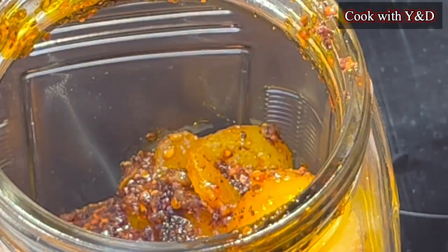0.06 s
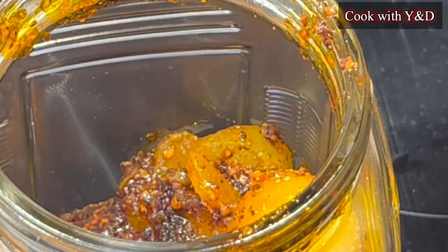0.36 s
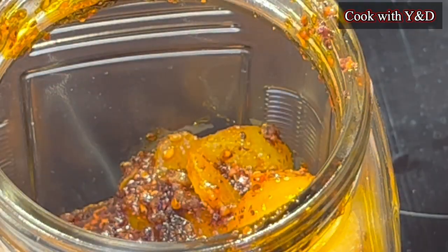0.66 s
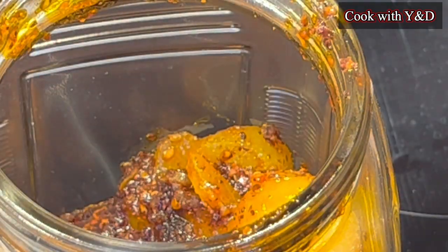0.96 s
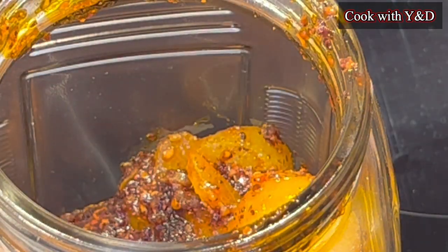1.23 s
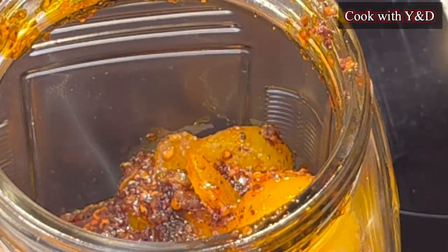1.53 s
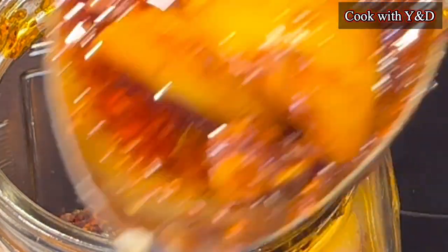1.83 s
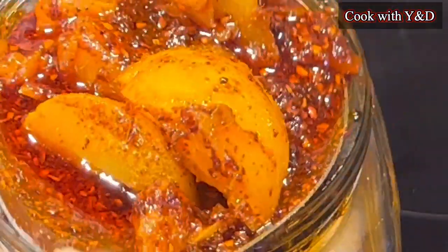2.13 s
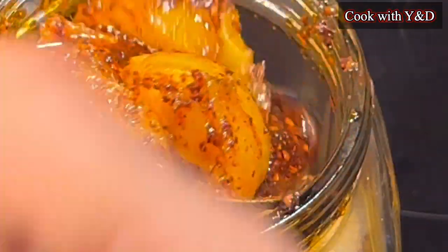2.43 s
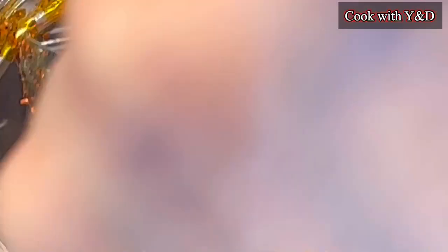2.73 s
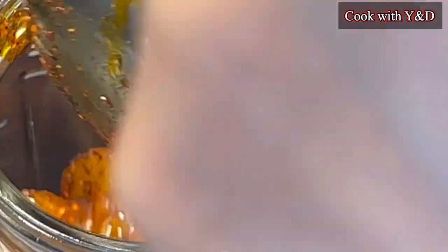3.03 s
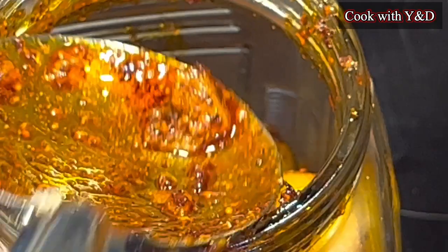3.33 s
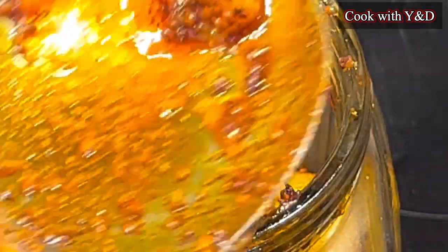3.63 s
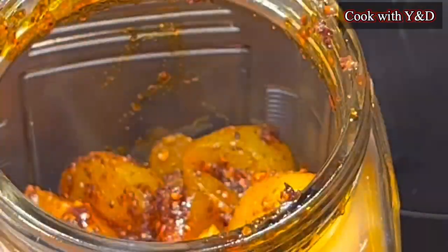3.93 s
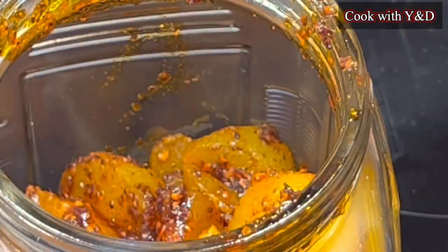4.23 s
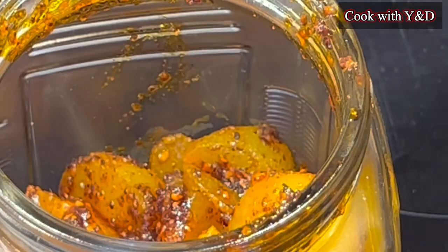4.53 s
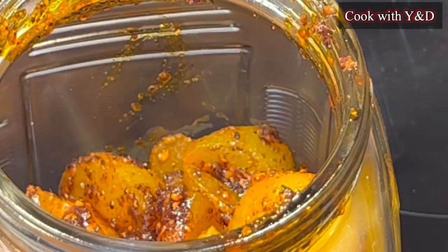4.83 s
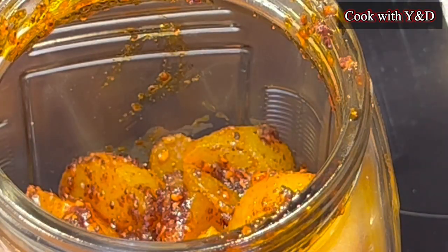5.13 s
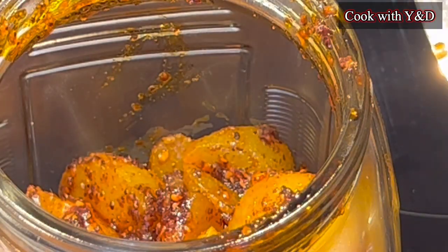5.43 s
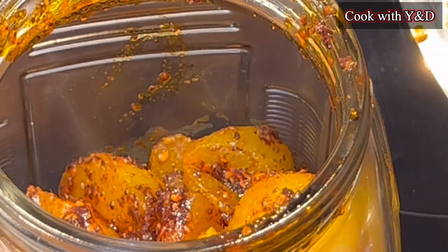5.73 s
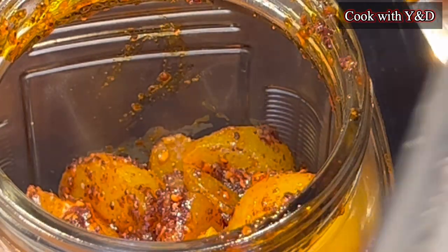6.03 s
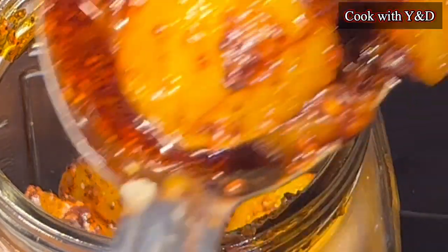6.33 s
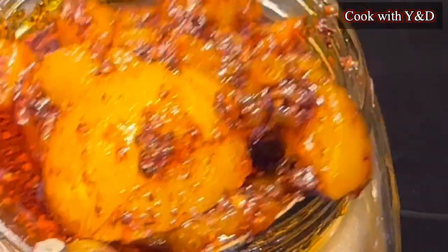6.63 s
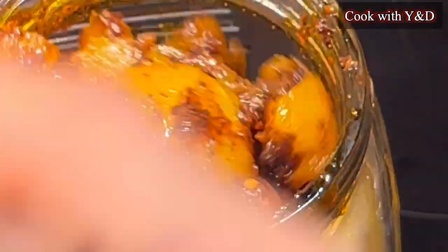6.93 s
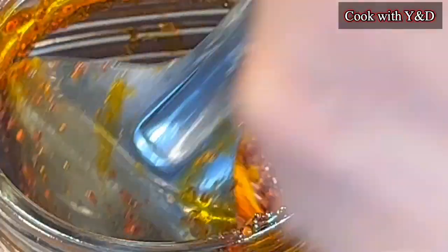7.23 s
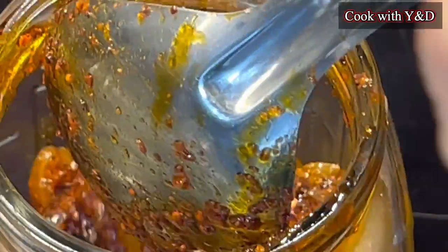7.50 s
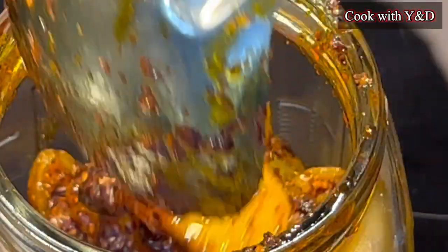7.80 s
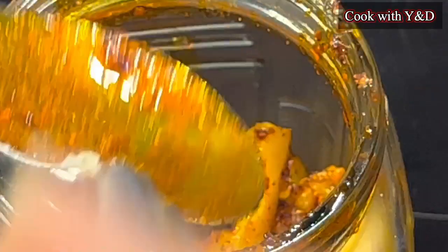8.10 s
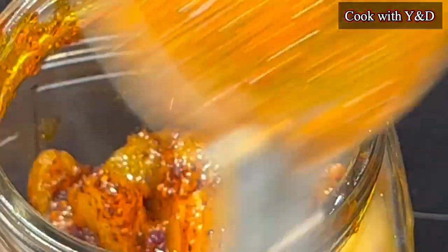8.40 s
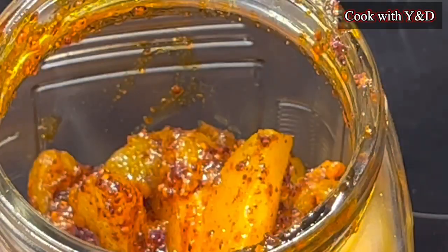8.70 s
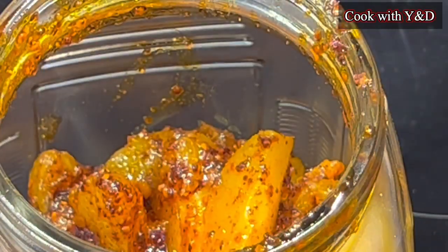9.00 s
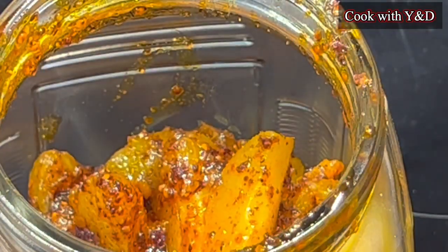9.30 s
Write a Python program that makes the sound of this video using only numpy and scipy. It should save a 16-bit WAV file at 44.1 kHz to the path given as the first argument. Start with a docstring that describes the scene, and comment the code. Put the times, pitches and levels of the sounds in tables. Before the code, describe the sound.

Heard close up in a small, slightly reverberant kitchen, a ladle scoops wet pickle from a metal bowl three times, scraping and knocking so the bowl rings briefly. Between the scoops come two quieter rounds at a glass jar: light clinks on the rim, squelching slides, soft thuds and a faint rumble as the jar rocks. Tiny oil bubbles pop over a low hum.

```python
"""A steel ladle scoops oily pickle from a metal bowl, tips it into a glass jar, twice, and scoops again.
Impacts excite the damped normal modes of bowl and jar; stick-slip friction makes them scrape and squeak.
Wet pieces slide and plop, air pockets resonate, oil bubbles burst and the jar rocks on the counter.
All is heard close up, with the rustle of an arm, in a small reverberant kitchen with a low hum."""
import sys
import numpy as np
from scipy import signal
from scipy.fft import rfft, irfft
from scipy.io import wavfile
from scipy.ndimage import uniform_filter1d

SR = 44100
rng = np.random.default_rng(int(sys.argv[2]) if len(sys.argv) > 2 else 0)


def store_wav(level_fs):
    """Save 16-bit WAV to argv[1]."""
    pcm = np.round(np.clip(np.atleast_2d(level_fs), -1, 1) * 32767)
    wavfile.write(sys.argv[1], SR, pcm.T.astype(np.int16))


N = 421139


def amp(db):
    """Amplitude ratio of a level in decibels."""
    return 10 ** (np.asarray(db) / 20)

def rms(x):
    """Root-mean-square amplitude."""
    return np.sqrt(np.mean(x ** 2) + 1e-20)

def unit_rms(x):
    """Normalisation to unit power."""
    return x / rms(x)

def curve_at(points, hz):
    """Linear interpolation on a logarithmic frequency axis."""
    frequencies, values = np.transpose(points)
    return np.interp(np.log(hz + 1), np.log(frequencies + 1), values)

def add(mix, start, sound):
    """Superposition: a sound joins the mix at its start time in seconds."""
    part = mix[max(round(start * SR), 0):][:len(sound)]
    part += sound[:len(part)]

def colour(x, points):
    """Minimum-phase filtering by a curve of (Hz, dB) points."""
    log_gain = np.log(amp(curve_at(points, abs(np.fft.fftfreq(2048, 1 / SR)))))
    taps = np.fft.ifft(np.exp(np.conj(signal.hilbert(log_gain)))).real
    return signal.oaconvolve(x, taps[:len(taps) // 2])[:len(x)]

# Edges in Hz of the bass, low, middle, high and top bands.
BAND_EDGES_HZ = [100, 450, 1200, 3000, 6500, 17000]
def bands(x):
    """A band-pass filter bank splits a sound five ways."""
    return [signal.sosfilt(signal.butter(4, edges, "band", fs=SR, output="sos"), x)
            for edges in zip(BAND_EDGES_HZ, BAND_EDGES_HZ[1:])]

def smooth_noise(size, seconds):
    """Low-pass noise: a random drift of unit power."""
    window = np.hanning(int(seconds * SR) + 3)
    return unit_rms(signal.oaconvolve(rng.standard_normal(size), window, "same"))

def grains(size, per_s, spread_db):
    """A Poisson process: independent impulses of uneven strength."""
    strength = amp(spread_db * np.minimum(rng.exponential(1, size), 4))
    return strength * rng.choice([-1, 1], size) * (rng.random(size) < per_s / SR)

def steadied(x, seconds=0.092):
    """Division by the running RMS removes slow swings and leaves the grain."""
    return x / np.sqrt(abs(uniform_filter1d(x ** 2, int(seconds * SR))) + 1e-12)

def gesture(length, level_db, change_db, attack_s, release_db_per_s):
    """Amplitude envelope of a movement: linear onset, swell or fade, then exponential decay."""
    t = np.arange(0, length + 50 / release_db_per_s, 1 / SR)
    held_db = level_db + change_db * np.minimum(t / length, 1)
    return np.minimum(t / attack_s, 1) * amp(held_db - release_db_per_s * np.maximum(t - length, 0))

def struck(modes, spot_hz, boost_db, width_hz=70):
    """The point of excitation weights the modes, favouring those near one frequency."""
    return [(hz, db + boost_db * np.exp(-((hz - spot_hz) / width_hz) ** 2), t60)
            for hz, db, t60 in modes]

def impulse_response(modes, clatter, ring_db, crack_s, clatter_t60, clatter_db):
    """Modal superposition: a few long modes over a noisy crack and dense, heavily damped modes."""
    t = np.arange(int(.8 * SR)) / SR
    decay = np.exp(-t / crack_s) + amp(clatter_db - 60 * t / clatter_t60)
    dense = colour(rng.standard_normal(len(t)) * decay, clatter)
    ring = np.zeros(len(t))
    for hz, db, t60 in modes:
        envelope = amp(db + 1.4 * rng.standard_normal() - 60 * t / t60)
        ring += envelope * np.sin(2 * np.pi * (hz * t + rng.random()))
    soft_onset = 1 - np.exp(-t / 0.00043)
    return (dense + amp(ring_db) * ring) * soft_onset

def blow(response, thump_db, clang_db, tick_db, onset_s):
    """An impact's spectrum: thump, clang and tick set the onset level of bass, middle and top."""
    low_db = thump_db + 0.55 * (clang_db - thump_db)
    high_db = clang_db + 0.27 * (tick_db - clang_db) - .5
    levels_db = [thump_db, low_db, clang_db, high_db, tick_db]
    return sum(amp(db) * band / rms(band[:int(onset_s * SR)])
               for db, band in zip(levels_db, bands(response)))

def free_vibration(rings, modes, t60_factor, attack_s, damping_db_per_s):
    """Free decay: once the ladle bounces clear, modes ring until ladle or pickle damps them."""
    out, t = np.zeros(N), np.arange(N) / SR
    mode_hz = [hz for hz, _, _ in modes]
    for hz, db, t60 in modes:
        envelope = np.zeros(N)
        for start, length, level_db, favoured_hz in rings:
            nearest_hz = [min(mode_hz, key=lambda other: abs(other - f)) for f in favoured_hz]
            if hz in nearest_hz:
                decay_db = -60 * length / (t60_factor * t60)
                add(envelope, start, gesture(length, level_db + db, decay_db, attack_s, damping_db_per_s))
        if envelope.any():
            waver = 1 + .16 * smooth_noise(N, seconds=.025)  # shifting pickle chokes and frees the mode
            out += envelope * waver * np.sin(2 * np.pi * (hz * t + rng.random()))
    return out

def bubbles(size, low_hz, high_hz, per_s, cycles):
    """Bubble resonance: air squeezed from wet pickle rings in damped, rising blips at twelve pitches."""
    out, t = np.zeros(size), np.arange(SR // 30) / SR
    for hz in np.geomspace(low_hz, high_hz, 12):
        envelope = np.exp(-hz * t / cycles) * (1 - np.exp(-hz * t))
        blip = envelope * np.sin(2 * np.pi * hz * t * (1 + 3 * t))
        out += signal.oaconvolve(grains(size, per_s, spread_db=3.5), blip)[:size]
    return out


# The part of diffuse sound that differs between the ports. Each row: frequency in Hz, gain in dB.
SIDE_SPECTRUM = [(100, -10.5), (400, -3.5), (1000, 2), (2500, -13), (6000, -21.5), (15000, -21)]
def diffuse_stereo(middle, side):
    """A diffuse field is only partly coherent between two microphone ports."""
    side = colour(side, SIDE_SPECTRUM)
    return np.array([middle + side, middle - side])

# Spectrum of still room air. Each row: frequency in Hz, relative level in dB.
AIR_SPECTRUM = [(53, -33.5), (90, 2), (205, -6), (255, -1), (310, -10.5), (360, 0), (429, -8.5), (532, -12),
                (786, -22), (1140, -21.5), (1290, -33.5), (2180, -24.5), (2890, -33), (8000, -34.5),
                (16000, -43)]
def background():
    """The noise floor: broadband air, a faint whine and a hum that beats with a narrow band of noise."""
    t = np.arange(N) / SR
    hum = amp(-49.5) * np.sin(2 * np.pi * 61.5 * t)
    drone = amp(-68) * unit_rms(smooth_noise(N, seconds=.08) * np.sin(2 * np.pi * 62 * t))
    middle, side = (unit_rms(colour(rng.standard_normal(N), AIR_SPECTRUM)) for _ in range(2))
    whine = amp(-90) * np.sin(2 * np.pi * 362 * t) + amp(-85.5) * np.sin(2 * np.pi * 1168 * t)
    return hum + drone + whine + amp(-68) * diffuse_stereo(middle, side)

# Reverberation of the kitchen. Each row: frequency in Hz, time to fall 60 dB in seconds.
KITCHEN_T60 = [(100, .35), (500, .36), (2000, .36), (5000, .28), (9000, .24), (16000, .19)]
def kitchen(x):
    """Reverberation: diffuse reflections decay exponentially, each band at its own rate."""
    hz, t, spectra = signal.stft(rng.standard_normal((2, SR // 2)), SR, nperseg=256)
    decay = amp(-60 * t / curve_at(KITCHEN_T60, hz)[:, None])
    tail = signal.istft(spectra * decay, SR)[1]
    tail *= np.clip(np.arange(tail.shape[1]) / SR / 0.0025, 0, 1)  # reflections build up
    tail /= np.linalg.norm(tail[0])
    return diffuse_stereo(*signal.fftconvolve(x[None], tail, axes=1)[:, :N])

# Swings of the arm. Each row: start and length in seconds, level and its change in dB.
ARM_SWINGS = [(3.6, .5, -82, 12.5), (5.614, 0.27, -86.5, 20)]
def arm_rustle():
    """Amplitude-modulated noise: a soft rustle follows the arm's speed between bowl and jar."""
    speed = np.zeros(N)
    for start, length, level_db, change_db in ARM_SWINGS:
        add(speed, start, gesture(length, level_db, change_db, attack_s=0.094, release_db_per_s=74))
    spectrum = [(200, -8.5), (700, 7), (1200, -7), (2500, -21), (8000, -31)]
    return speed * unit_rms(colour(rng.standard_normal(N), spectrum))

# The ladle leans on the jar. Each row: start and length in seconds, level and its change in dB.
JAR_LEANS = [(2.41, 0.58, -51.5, -8), (6.714, 0.62, -51, -1.5)]
def jar_rocking():
    """Repeated impacts of the rocking jar on the counter merge into a deep, band-limited rumble."""
    lean = np.zeros(N)
    for start, length, level_db, change_db in JAR_LEANS:
        add(lean, start, gesture(length, level_db, change_db, attack_s=0.45, release_db_per_s=45))
    bass_filter = signal.butter(3, [55, 85], "band", fs=SR, output="sos")
    bumps = signal.sosfilt(bass_filter, grains(N, per_s=600, spread_db=1.2))
    return lean * steadied(bumps, seconds=0.042)

# Oil bubbles. Each row: start in seconds, relative level in dB, pitch in Hz, time constant in seconds.
OIL_BURSTS = [(0.6694, -40.5, 7040, 0.000091), (0.8358, -63.5, 1930, 0.00025),
              (1.1257, -58.5, 2690, .00019), (3.1572, -59.5, 4270, 0.00027), (4.643, -48, 3400, 0.00014),
              (4.675, -44.5, 5030, 0.00015), (4.7013, -39.5, 2250, 0.00012), (4.8417, -26.5, 1760, 0.00013),
              (4.9753, -41.5, 3280, 0.00046), (5.215, -57, 2810, 0.00021), (5.3586, -54.5, 4700, 0.00016),
              (5.8586, -51.5, 8300, 0.00018), (6.6167, -47.5, 8780, 0.00013),
              (7.5843, -55.5, 2470, 0.00081)]
def oil_pops():
    """A bursting bubble radiates a heavily damped pulse, followed by a fine spatter."""
    out, t = np.zeros(N), np.arange(SR // 30) / SR
    for start, level_db, hz, decay_s in OIL_BURSTS:
        age = t / decay_s
        snap = np.sin(2 * np.pi * hz * t) * age ** 2 * np.exp(-age)
        spray = colour(rng.standard_normal(len(t)), [(hz / 4, -24), (hz, 0), (hz * 2, -8), (hz * 4, -22)])
        spatter = amp(-27.5) * unit_rms(spray) * np.exp(-t / 0.0076)
        add(out, start, amp(level_db + 5) * (snap + spatter))
    return out

# Spectra of sliding pickle. Each row: frequency in Hz, relative level in dB.
RUMBLE_SPECTRUM = [(40, -21), (65, -17), (90, -5), (140, 2.5), (200, -9), (300, -16), (500, -24.5),
                   (1000, -58)]
SQUELCH_SPECTRUM = [(150, -16), (400, 7), (600, -7), (900, 5.5), (1500, -11), (2500, 0), (5000, -37),
                    (12000, -49)]
# Pickle settles in the jar. Each row: start and length in seconds, then relative level,
# its change and the gain of the squelch, all in dB.
PICKLE_SLIDES = [(2.383, 0.12, -59, 9.5, -22.5), (2.5, 0.071, -49, -5, -19.5),
                 (2.653, 0.036, -57, 1, -18.5), (2.828, 0.03, -57.5, -0.5, -1),
                 (2.986, 0.072, -58, -4, -15), (3.265, 0.096, -45.5, -7.5, -21),
                 (6.673, 0.024, -51.5, 2, -32), (6.753, 0.19, -54.5, 7, -18), (6.888, 0.047, -46.5, 2, -19),
                 (6.975, 0.064, -55, -7, -26), (7.23, 0.063, -43.5, -9, -16),
                 (7.298, 0.065, -63.5, 7, -1.5), (7.455, 0.076, -50.5, -11.5, -9),
                 (7.555, 0.22, -66.5, 8.5, -11.5), (7.777, 0.034, -50, -7.5, -15),
                 (8.01, 0.018, -50.5, -0.5, -27), (8.06, 0.12, -65.5, -3, -11.5)]
def pickle_slides():
    """Shot noise: many small contacts of soft, wet pieces add up to a rumble and a squelch."""
    out = np.zeros(N)
    for start, length, level_db, change_db, wet_db in PICKLE_SLIDES:
        flow = gesture(length, level_db, change_db, attack_s=0.0049, release_db_per_s=209)
        rumble = colour(grains(len(flow), per_s=350, spread_db=4.5), RUMBLE_SPECTRUM)
        squish = colour(grains(len(flow), per_s=1400, spread_db=-0.5), SQUELCH_SPECTRUM)
        blips = bubbles(len(flow), low_hz=501, high_hz=678, per_s=25, cycles=13)
        squelch = unit_rms(squish) + amp(-4) * unit_rms(blips)
        add(out, start, flow * (steadied(rumble) + amp(wet_db) * steadied(squelch)))
    return out

# Pieces land in the jar. Each row: start in seconds, relative levels of thud and splat in dB.
LANDINGS = [(2.503, -55.5, -56.5), (2.554, -56.5, -66.5), (3.243, -34.5, -43), (3.262, -35, -45.5),
            (6.891, -52.5, -46.5), (6.933, -36, -44), (7.425, -32, -36.5), (7.443, -42, -50.5)]
def pickle_plops():
    """Inelastic impact: a soft piece lands with a dull thud and a shorter wet splat."""
    out, t = np.zeros(N), np.arange(SR // 4) / SR
    thud_spectrum = [(50, -27), (90, -2.5), (150, 9.5), (300, -4), (500, -3.5), (1200, -65)]
    splat_spectrum = [(200, 1), (550, 3.5), (900, -2.5), (1400, 2), (2500, -10.5), (5000, -25.5),
                      (7000, -54), (12000, -60)]
    for start, thud_db, splat_db in LANDINGS:
        for db, decay_s, spectrum in [(thud_db, 0.015, thud_spectrum), (splat_db, 0.0062, splat_spectrum)]:
            burst = colour(rng.standard_normal(len(t)) * np.exp(-t / decay_s), spectrum)
            add(out, start, amp(db) * burst / rms(burst[:int(.025 * SR)]))
    return out

# Normal modes of the jar. Each row: frequency in Hz, relative level in dB, T60 in seconds.
JAR_MODES = [(590, 0, .13), (660, -3, .1), (830, -12, .15), (1490, -12, .15), (2234, -12, .2),
             (2520, -8, .12), (2635, 3, .16), (2862, 0, .19), (3300, -10, .1), (3607, -1, .11),
             (3806, 3, .09), (3930, 2, .1), (4700, -10, .1), (5200, -9, .12), (5545, -8, .12),
             (5803, -9, .12), (6700, -9, .12), (7429, -7, .12), (7671, -5, .14), (8107, -6, .12),
             (11900, -13, .1)]
# Its dense, oil-damped modes. Each row: frequency in Hz, relative level in dB.
JAR_DENSE_SPECTRUM = [(100, 21), (250, 5.5), (600, 9), (900, 0), (2000, 0), (2700, 8), (3200, 1), (3850, 8),
                      (4450, -3), (5600, -2.5), (6700, -6.5), (7600, -2.5), (8600, -5.5), (12000, -5.5),
                      (15500, -13)]
def jar_response(spot_hz, ring_db, **decay):
    """Loading by ladle and pickle shifts the modes of the glass a little at each contact."""
    loaded = [(hz * (1 + .005 * rng.standard_normal()), db, t60)
              for hz, db, t60 in struck(JAR_MODES, spot_hz, boost_db=9)]
    return impulse_response(loaded, JAR_DENSE_SPECTRUM, ring_db, **decay)

# The jar rings on. Each row: start and undamped time in seconds, relative level in dB, modes in Hz.
JAR_FREE_RINGS = [(2.523, .025, -61.5, [590, 5545, 5803]), (2.833, 0.048, -69, [2635, 3607, 5545]),
                  (2.834, .045, -52.5, [660]), (3.239, 0.0076, -37, [3806]),
                  (3.241, .05, -45.5, [2862, 3607]), (6.677, 0.019, -62.5, [3806]),
                  (6.818, 0.029, -62, [2635, 3806]), (6.912, 0.033, -49.5, [660, 3806, 6700]),
                  (7.222, 0.0022, -37.5, [2635]), (7.223, .08, -49.5, [590, 2862]),
                  (7.352, 0.031, -60.5, [660, 2635, 3607]), (7.759, 0.065, -44, [2862]),
                  (7.76, .03, -59, [3607, 7671])]
def jar_ringing():
    """Free vibration of the glass after a contact."""
    return free_vibration(JAR_FREE_RINGS, JAR_MODES, t60_factor=1.5, attack_s=.00069, damping_db_per_s=659)

# The ladle rubs the rim. Each row: start and length in seconds, relative level and its change in dB,
# favoured mode in Hz.
RIM_RUBS = [(2.818, 0.045, -67.5, -3.5, 3607), (3.258, 0.056, -46.5, -14, 7671),
            (6.686, 0.14, -69.5, -3, 4700), (6.795, 0.041, -62.5, 9.5, 2635), (6.913, 0.011, -43, -5, 3806),
            (7.177, 0.011, -65, -2, 2635), (7.243, 0.075, -61.5, 3.5, 2635), (7.339, 0.008, -56, 1, 3607),
            (7.366, 0.019, -58, -9, 5545), (7.573, 0.014, -68.5, -5.5, 3930),
            (7.662, 0.049, -68.5, -4, 2862), (7.749, 0.014, -48, -1, 5803)]
def jar_rubs():
    """Forced vibration: random frictional slips drive the modes of the glass."""
    out = np.zeros(N)
    spectrum = [(600, -7), (1800, 2), (2700, -7.5), (4500, -5.5), (6500, -4), (8000, -10), (15000, -24)]
    for start, length, level_db, change_db, spot_hz in RIM_RUBS:
        pressure = gesture(length, level_db, change_db, attack_s=0.0023, release_db_per_s=298)
        response = jar_response(spot_hz, ring_db=-21, crack_s=.001, clatter_t60=.05, clatter_db=-16)
        slips = grains(len(pressure) + len(response) - 1, per_s=1200, spread_db=4.5)
        rub = colour(signal.fftconvolve(slips, response, "valid"), spectrum)
        add(out, start, pressure * steadied(rub))
    return out

# The ladle hits the rim. Each row: start in seconds, relative levels of thump, clang, tick and ring
# in dB, favoured mode in Hz.
RIM_STRIKES = [(2.523, -63.5, -69.5, -42, -39, 5803), (2.834, -52.5, -65, -70, -10, 590),
               (2.863, -51, -59, -69, -16, 590), (3.238, -54, -31, -28, -24.5, 7671),
               (6.675, -43, -63, -68.5, -13, 3806), (6.826, -71, -56, -73, -22, 3930),
               (6.911, -49, -46.5, -57, -18, 3930), (6.943, -49.5, -51, -62, -34, 3806),
               (7.222, -38.5, -45, -37.5, -26, 7429), (7.262, -46, -51, -67, -12, 590),
               (7.336, -53.5, -56, -60, -13, 3607), (7.353, -40.5, -48.5, -57.5, -16.5, 3930),
               (7.372, -40, -60, -69, -8, 590), (7.704, -66, -54, -68.5, -21, 2862),
               (7.759, -53, -41.5, -39.5, -24.5, 5803), (8.01, -70, -59, -70, -11, 3806)]
def jar_clinks():
    """Impulsive excitation of the glass: each spot struck brings out its own pitch."""
    out = np.zeros(N)
    for start, thump_db, clang_db, tick_db, ring_db, spot_hz in RIM_STRIKES:
        response = jar_response(spot_hz, ring_db, crack_s=.005, clatter_t60=.09, clatter_db=-13)
        add(out, start, blow(response, thump_db, clang_db, tick_db, onset_s=0.019))
    return out

# Air trapped under the ladle. Each row: start and length in seconds, first and last pitch in Hz,
# relative level in dB.
AIR_POCKETS = [(0.296, 0.011, 2220, 1930, -51.5), (0.329, 0.0071, 1770, 1880, -46),
               (0.365, 0.0067, 1700, 1820, -43), (0.393, 0.024, 4020, 3760, -38),
               (0.403, 0.033, 1350, 1727, -39), (0.456, 0.037, 1748, 1596, -45),
               (4.14, 0.011, 483, 604, -46), (4.362, 0.009, 1530, 1690, -52),
               (4.436, 0.023, 3970, 3960, -39), (4.48, 0.034, 3200, 2670, -43),
               (4.516, 0.022, 1924, 1730, -43), (4.537, 0.0048, 1790, 1680, -29),
               (4.567, 0.029, 1670, 1660, -52), (4.572, 0.011, 424.5, 540, -45.5),
               (9.326, 0.014, 1860, 2010, -30), (9.364, 0.0087, 1770, 2126, -31),
               (9.356, 0.032, 3450, 3090, -38.5), (9.407, 0.027, 2060, 1780, -49)]
def gurgles():
    """Cavity resonance: an air pocket rings in a narrow band that glides as the ladle squeezes it."""
    out, width_hz = np.zeros(N), 170
    for start, length, first_hz, last_hz, level_db in AIR_POCKETS:
        squeeze = gesture(length, level_db, change_db=0, attack_s=.004, release_db_per_s=801)
        hz = np.interp(np.arange(len(squeeze)) / SR, [0, length], [first_hz, last_hz])
        wobble = smooth_noise(len(hz), 1 / width_hz) + 1j * smooth_noise(len(hz), 1 / width_hz)
        resonance = (wobble * np.exp(2j * np.pi * np.cumsum(hz) / SR)).real
        add(out, start, squeeze * steadied(resonance, seconds=0.034))
    return out

# Normal modes of the bowl. Each row: frequency in Hz, relative level in dB, T60 in seconds.
BOWL_MODES = [(565, -8, .25), (608, -9, .15), (772, -5, .3), (907, -9, .22), (980, -7, .2), (1105, -9, .16),
              (1250, -12, .16), (1497, -9, .42), (1605, -6, .3), (1886, -8, .14), (2192, 0, .43),
              (2233, -8, .3), (2271, -5, .26), (2366, -6, .17), (2517, -5, .28), (3085, -12, .22),
              (3268, -10, .18), (3500, -7, .18), (3747, -8, .26), (3984, -8, .17), (4080, -8, .16),
              (5140, -12, .16), (7062, -8, .17), (7150, -5, .11), (7408, -6, .16), (7741, -7, .12),
              (8199, -8, .16)]
# Its dense, oil-damped modes. Each row: frequency in Hz, relative level in dB.
BOWL_DENSE_SPECTRUM = [(100, -22), (250, -4), (430, -7.5), (600, 4), (820, 3.5), (1100, 1.5), (1650, 0),
                       (2300, 5.5), (3000, -0.5), (3800, 0.5), (4600, -1), (6500, -7), (7400, 2.5),
                       (9000, 0.5), (12000, -1), (15500, -9)]
def bowl_response(spot_hz, ring_db, **decay):
    """Impulse response of the metal bowl at one point of contact."""
    modes = struck(BOWL_MODES, spot_hz, boost_db=6)
    return impulse_response(modes, BOWL_DENSE_SPECTRUM, ring_db, **decay)

# The bowl rings on. Each row: start and undamped time in seconds, relative level in dB, modes in Hz.
BOWL_FREE_RINGS = [(0.232, 0.035, -33.5, [1105, 2400, 3984]), (0.44, .15, -45.5, [2192]),
                   (0.46, 0.058, -44, [772, 1497, 1605]), (4.455, .035, -45, [2192]),
                   (4.55, 0.19, -57, [2192, 2271]), (4.543, 0.093, -41, [1605]),
                   (5.032, 0.075, -43.5, [565, 1497, 2192, 2517]), (5.032, 0.076, -41.5, [772]),
                   (5.034, .045, -49, [1605, 2271, 3747]), (5.1, .09, -62, [1497, 2517]),
                   (8.88, 0.073, -46, [2500]), (8.968, .13, -52.5, [2192]), (9.11, .16, -48, [565, 2192]),
                   (9.42, 0.15, -45, [2192, 2271])]
def bowl_ringing():
    """Free vibration of the metal wall after a contact."""
    return free_vibration(BOWL_FREE_RINGS, BOWL_MODES, t60_factor=1.63, attack_s=.006, damping_db_per_s=481)

# The ladle's edge catches. Each row: start and length in seconds, initial slip rate in Hz,
# relative level and its change in dB.
EDGE_SQUEAKS = [(0.043, 0.025, 3800, -38.5, -6), (0.103, 0.0063, 2360, -52, 3),
                (8.803, 0.015, 1147, -32, 7.5), (8.87, 0.0048, 1135, -24, 0),
                (9.095, 0.034, 1180, -27.5, -5)]
def bowl_squeaks():
    """Periodic stick-slip makes a sagging harmonic tone that drives the bowl's longest-lived mode."""
    out, t = np.zeros(N), np.arange(SR) / SR
    harmonics_db, sag_hz_per_s = [-9.5, -1, -16.5, -30, -20], 620
    for start, length, hz, level_db, change_db in EDGE_SQUEAKS:
        grip = gesture(length, level_db, change_db, attack_s=0.0017, release_db_per_s=896)
        slip_hz = hz - sag_hz_per_s * np.arange(len(grip)) / SR
        jitter = 1 + 0.014 * smooth_noise(len(grip), seconds=0.0055)
        phase = 2 * np.pi * np.cumsum(slip_hz * jitter) / SR
        tone = sum(amp(db) * np.sin(k * phase) for k, db in enumerate(harmonics_db, 1))
        add(out, start, grip * unit_rms(tone))
    mode_hz, _, t60 = max(BOWL_MODES, key=lambda mode: mode[2])
    ring = amp(-65 - 60 * t / t60) * np.sin(2 * np.pi * mode_hz * t)
    return out + signal.oaconvolve(out, ring)[:N]

def shifting_pickle(x, depth_db):
    """Time-varying damping: pickle moving under the ladle opens and mutes patches of the spectrum."""
    spectra = signal.stft(x, nperseg=256)[2]
    patches = uniform_filter1d(rng.standard_normal(spectra.shape), size=4, axis=0)
    patches = uniform_filter1d(patches, size=6, axis=1)
    return signal.istft(spectra * amp(depth_db * unit_rms(patches)))[1][:len(x)]

# Spectra of steel friction and of snapping seeds and sticky films. Each row: frequency in Hz, gain in dB.
FRICTION_SPECTRUM = [(450, -8.5), (600, -4.5), (850, -3), (1200, -3), (1700, 0.5), (2600, 1), (3900, -2.5),
                     (5000, -2), (8000, 1.5)]
CRACKLE_SPECTRUM = [(600, -22.5), (2000, -4.5), (3800, -1.5), (5500, -5.5), (8000, 2), (15000, -5)]
# Relative levels in dB of the low, middle, high and top bands of a stroke with no tilt.
STROKE_BANDS_DB = [-8, -5, -3.5, -2]
# The ladle drags through the bowl. Each row: start and length in seconds, relative level and its change
# in dB, spectral tilt in dB per octave, ring level in dB, favoured mode in Hz.
LADLE_STROKES = [(0.0, 0.069, -48.5, -1.5, 1.5, -21, 3747), (0.09, 0.056, -60, -2, 2.5, -24, 3747),
                 (0.253, 0.13, -56.5, 5, 0, -27, 3984), (0.308, 0.033, -51, 0.5, 1.5, -19, 8199),
                 (0.389, 0.049, -40, 0, -3, -27.5, 3880), (0.45, 0.071, -41.5, -10.5, -3.5, -31, 1497),
                 (0.597, 0.067, -62, -4, 2, -38, 3085), (4.132, 0.12, -52, -0.5, 0, -26, 7408),
                 (4.271, 0.17, -60.5, 8, -0.5, -21, 3747), (4.447, 0.055, -39, -1, -4.5, -29, 3268),
                 (4.5, 0.023, -34, -7, 0, -35, 8199), (4.536, 0.043, -46.5, -10.5, -6, -28, 1630),
                 (8.836, 0.0519, -52, 9.5, 0.5, -19, 2250), (8.913, 0.021, -63, -16, -10, -20, 2271),
                 (9.125, 0.06, -59.5, 14, 2.5, -26, 8199), (9.216, 0.091, -55.5, 10.5, -0.5, -31, 3500),
                 (9.337, 0.036, -41.5, 5.5, -1.5, -17, 3500), (9.384, 0.075, -43.5, 2.5, 0.5, -29.5, 7408)]
def bowl_scrapes():
    """Sliding friction: dense slips of steel on steel drive the bowl; the pickle bubbles and crackles."""
    out = np.zeros(N)
    centres_hz = np.sqrt(np.multiply(BAND_EDGES_HZ[1:-1], BAND_EDGES_HZ[2:]))
    octaves = np.log2(centres_hz / centres_hz[1])
    for start, length, level_db, change_db, tilt, ring_db, spot_hz in LADLE_STROKES:
        pressure = gesture(length, level_db, change_db, attack_s=0.0069, release_db_per_s=330)
        size = len(pressure)
        response = bowl_response(spot_hz, ring_db, crack_s=.0014, clatter_t60=.05, clatter_db=-16)
        slips = grains(size + len(response) - 1, per_s=2200, spread_db=3)
        friction = colour(signal.fftconvolve(slips, response, "valid"), FRICTION_SPECTRUM)
        friction = shifting_pickle(friction, depth_db=3.8)
        levels_db = STROKE_BANDS_DB + tilt * octaves
        stroke = sum(amp(db) * steadied(band) for db, band in zip(levels_db, bands(friction)[1:]))
        wet = steadied(bubbles(size, low_hz=1340, high_hz=2260, per_s=15, cycles=3.3))
        snaps = signal.fftconvolve(grains(size, per_s=90, spread_db=3.5), response[:SR // 150])[:size]
        crackle = amp(-8 + tilt * octaves[-1]) * unit_rms(colour(snaps, CRACKLE_SPECTRUM))
        add(out, start, pressure * (stroke + amp(-10.5) * wet + crackle))
    return out

# The ladle hits the bowl. Each row: start in seconds, relative levels in dB of the whole bowl's thump,
# the wall's clang, the tick of bare steel and the ring, then favoured mode in Hz.
BOWL_STRIKES = [(0.221, -50.5, -34, -28.5, -18.5, 2233), (0.239, -58, -41.5, -40, -32, 3984),
                (0.397, -55, -31.5, -46, -20.5, 1497), (0.441, -64, -61, -41.5, -33, 8199),
                (0.521, -51, -52, -83, -35, 1605), (0.595, -51, -55.5, -47, -34.5, 565),
                (0.619, -86, -48.5, -52, -30, 2366), (4.120, -40, -47, -25, -26.5, 573),
                (4.198, -59.5, -42, -42.5, -22, 1605), (4.218, -57, -40.5, -49, -33, 2517),
                (4.256, -59, -65, -43.5, -36, 7408), (4.366, -53.5, -53, -62, -27, 1605),
                (4.438, -49, -25.5, -29.5, -21, 3984), (4.473, -53, -50, -36, -30, 7150),
                (4.542, -50.5, -42, -70, -15.5, 1605), (4.598, -81, -45.5, -66, -25, 1605),
                (5.032, -49, -38, -32, -25.5, 2517), (5.100, -54.5, -50, -42, -26, 772),
                (8.773, -42.5, -59, -57.5, -15.5, 570), (8.805, -41, -41, -37.5, -25.5, 2366),
                (8.873, -52, -42.5, -40.5, -24, 2271), (8.927, -74, -57, -61, -35, 2271),
                (8.968, -50.5, -50, -68, -9, 2233), (9.101, -31, -26.5, -27, -31.5, 560),
                (9.327, -59, -28.5, -33.5, -19.5, 1886), (9.461, -61, -45, -33.5, -14, 8199)]
def bowl_knocks():
    """Impulsive excitation: a blow of the ladle starts all the bowl's modes at once."""
    out = np.zeros(N)
    for start, thump_db, clang_db, tick_db, ring_db, spot_hz in BOWL_STRIKES:
        response = bowl_response(spot_hz, ring_db, crack_s=.004, clatter_t60=.11, clatter_db=-11)
        add(out, start, blow(response, thump_db, clang_db, tick_db, onset_s=0.017))
    return out


def scene():
    """Superposition of the direct sound, the kitchen's reverberant field and the noise floor."""
    bowl = amp(-6) * bowl_knocks() + amp(-2) * bowl_scrapes() + amp(-5) * bowl_squeaks()
    bowl += amp(-3.5) * gurgles() + bowl_ringing()
    jar = amp(-10.5) * jar_clinks() + amp(-2) * pickle_slides() + amp(-4) * jar_rubs()
    jar += amp(-6) * pickle_plops() + jar_ringing()
    oil = oil_pops()
    direct = bowl + jar + oil + jar_rocking()
    reflections = kitchen(amp(-11) * bowl + amp(-11.5) * jar + amp(-16) * oil)
    return direct + reflections + arm_rustle() + background()

# Phase between the microphone ports. Each row: frequency in Hz, lead of the left in radians.
PORT_PHASE_LEAD = [(150, 0), (600, .35), (1300, -.4), (2200, .1), (3300, .65), (5000, .05), (6800, 0),
                   (8000, .3), (8700, -.2), (9300, -1.9), (10300, -3.14), (11800, -6.1), (12400, -6.6),
                   (13800, -9.4), (15300, -12.3)]
# Balance of the ports. Each row: frequency in Hz, left minus right in dB.
PORT_LEVEL_DIFFERENCE = [(100, 0.33), (180, 0.5), (350, -6), (650, 1.5), (1300, 0.2), (2400, -1), (4400, 0),
                         (15000, 0.5)]
def record(dry):
    """Phase and level differences between two microphone ports give stereo; a low-pass limits the band."""
    hz = np.fft.rfftfreq(N, 1 / SR)
    left = np.exp(.5j * curve_at(PORT_PHASE_LEAD, hz)) * amp(curve_at(PORT_LEVEL_DIFFERENCE, hz) / 2)
    stereo = irfft(rfft(dry) * np.array([left, 1 / left]), N)
    low_pass = signal.firwin(255, cutoff=16300, window=("kaiser", 9), fs=SR)
    return signal.oaconvolve(stereo, low_pass[None], "same")


dry = scene()
out = record(dry)
store_wav(out)
```